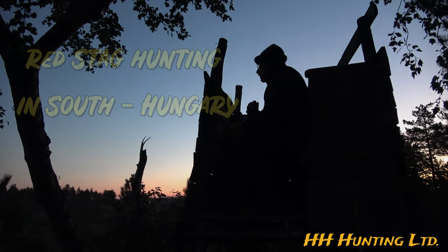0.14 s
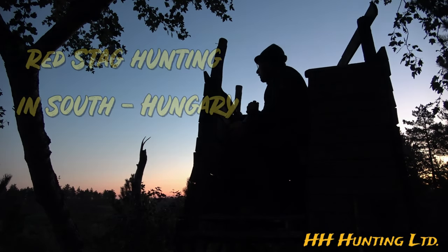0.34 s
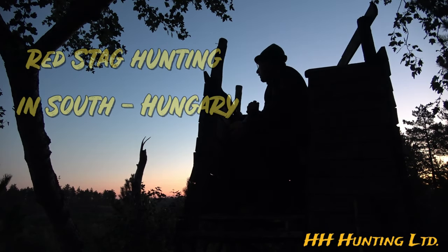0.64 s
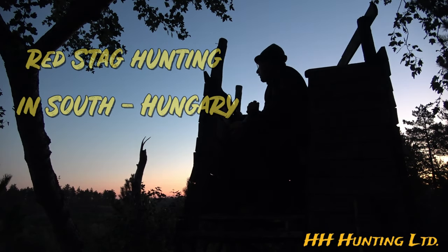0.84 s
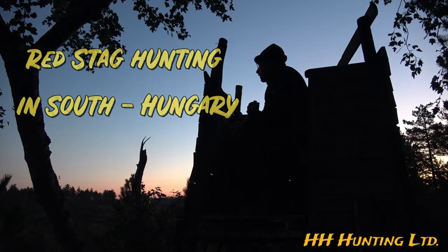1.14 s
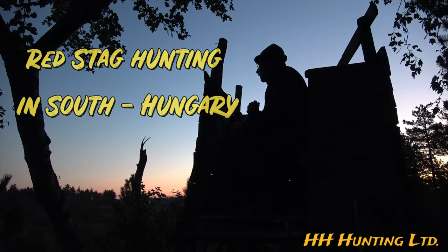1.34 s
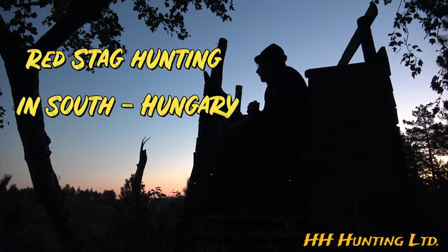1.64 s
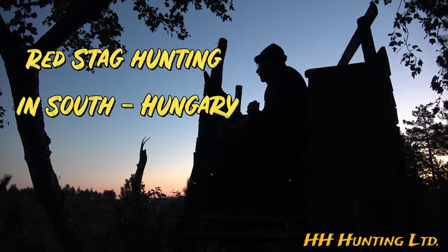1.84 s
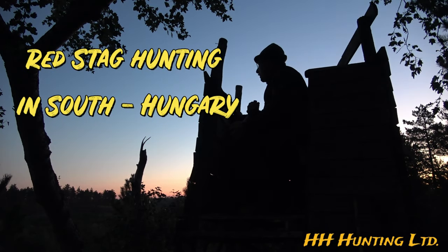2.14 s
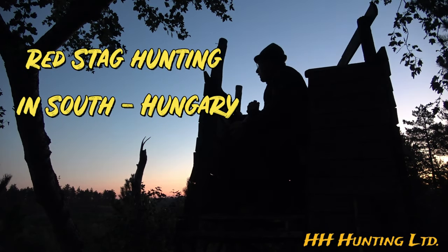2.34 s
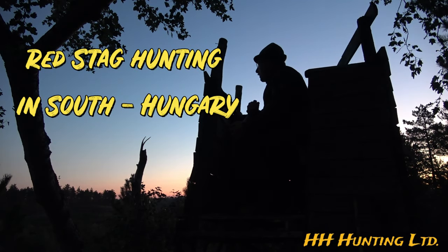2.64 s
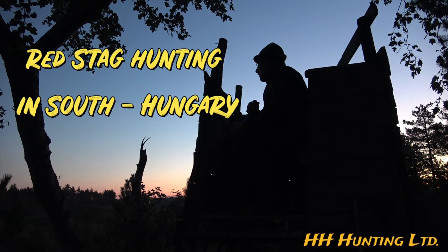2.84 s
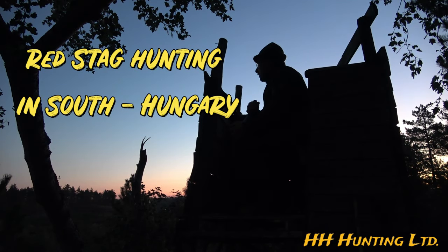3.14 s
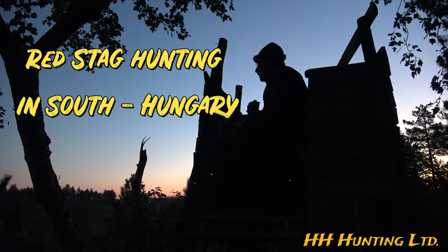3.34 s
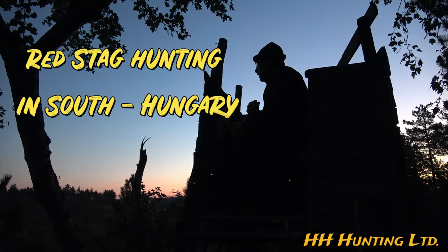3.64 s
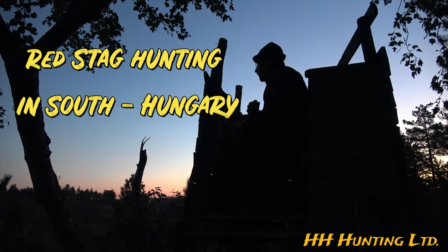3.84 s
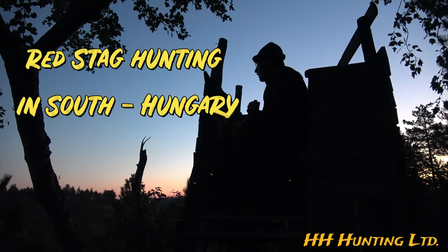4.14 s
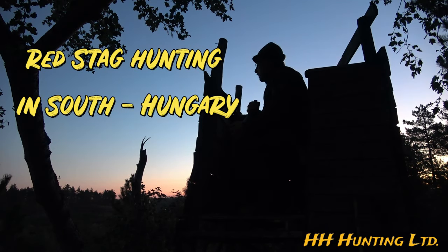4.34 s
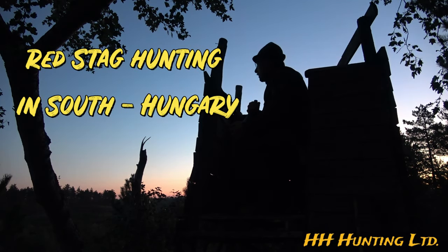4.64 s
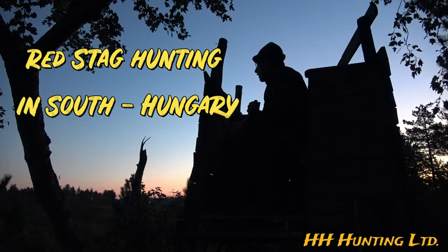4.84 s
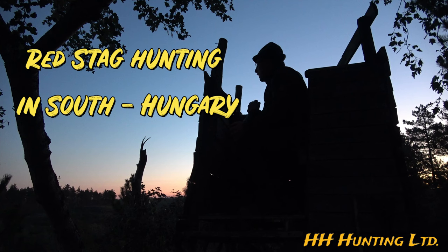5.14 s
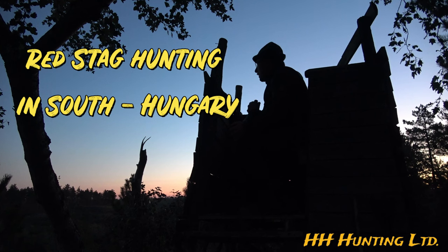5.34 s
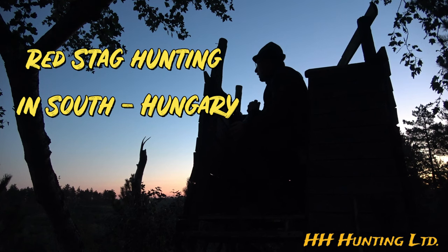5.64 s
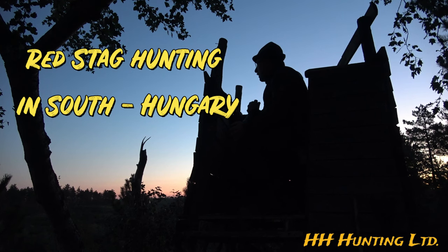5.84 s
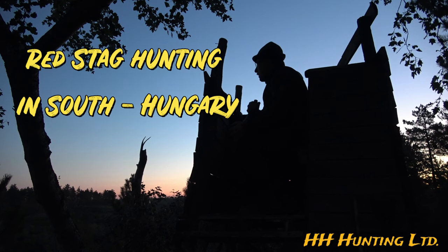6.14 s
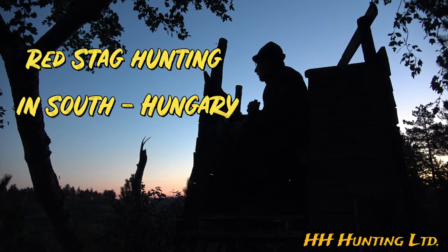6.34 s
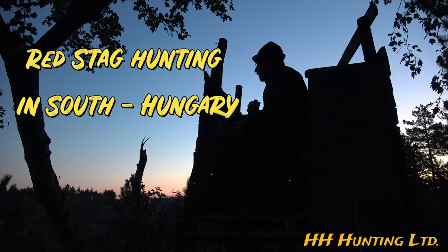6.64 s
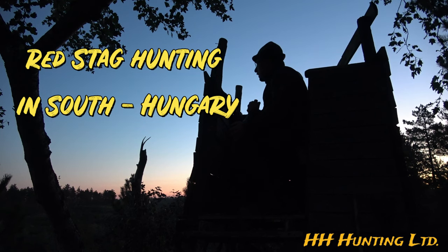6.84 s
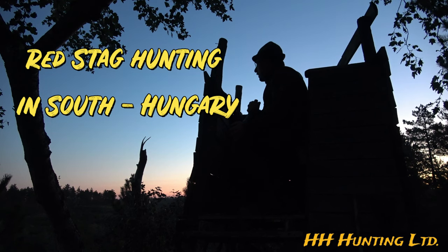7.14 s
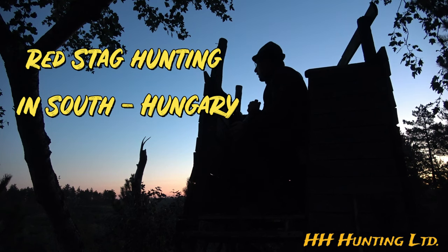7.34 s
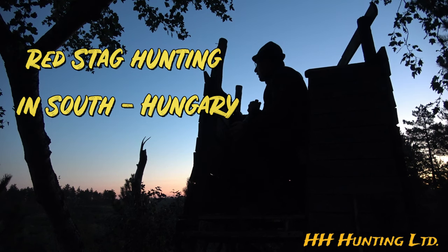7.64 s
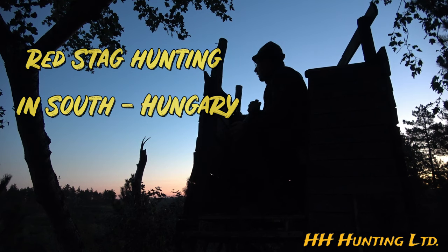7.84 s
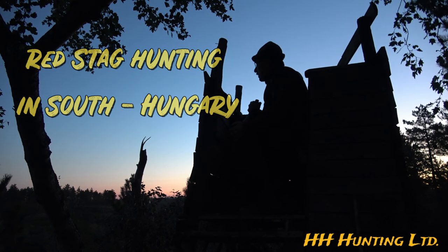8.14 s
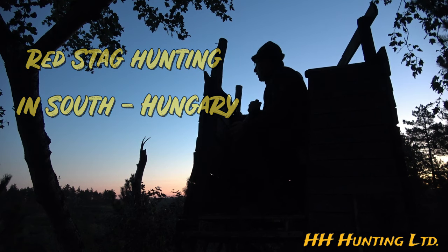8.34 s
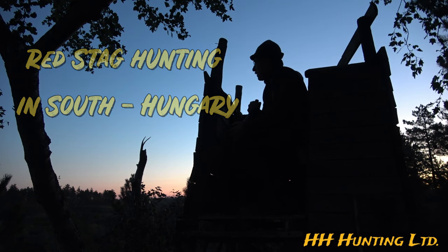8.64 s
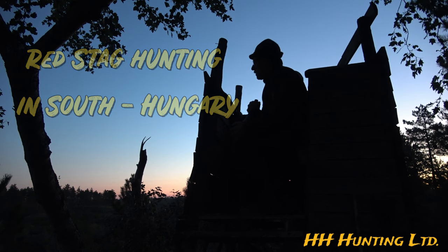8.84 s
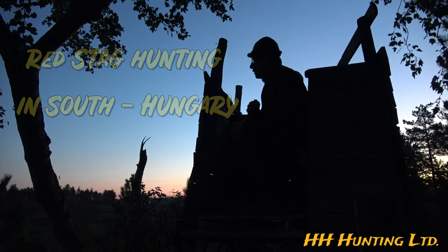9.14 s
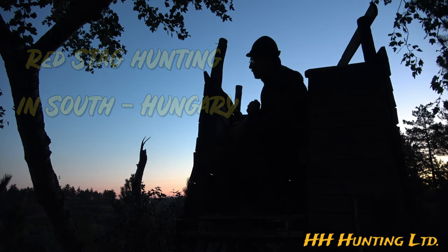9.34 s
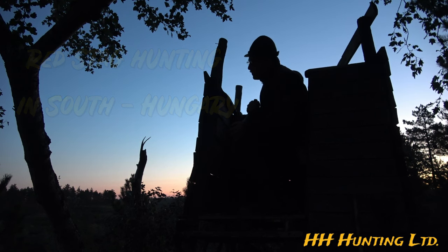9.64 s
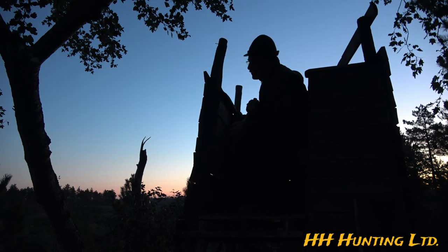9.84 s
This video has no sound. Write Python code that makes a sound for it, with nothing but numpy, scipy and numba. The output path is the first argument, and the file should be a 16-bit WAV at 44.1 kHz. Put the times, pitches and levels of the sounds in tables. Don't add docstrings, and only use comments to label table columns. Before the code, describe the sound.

A stag in rut gives a bout of seven rough, nasal, throaty roars with short gaps between them. The first climbs and drops, the second starts thin, the third is long and level, and the rest become shorter and deeper. Near echoes and a dim forest tail follow. Deep wind thuds on the outdoor microphone throughout, with soft air, sparse cricket trills, small leaf stirrings and dry twig clicks.

```python
import sys
import numpy as np
from scipy import signal
from scipy.fft import rfft, irfft
from scipy.io import wavfile
from scipy.ndimage import uniform_filter1d
from numba import njit

SR = 44100
rng = np.random.default_rng(int(sys.argv[2]) if len(sys.argv) > 2 else 0)


def how_loud(loudness_db):
    steps = np.asarray(loudness_db, float) / 20
    return 10 ** steps


def dump_mix(stems):
    frames = np.atleast_2d(stems).T
    limited = np.clip(frames, -1, 1)
    pcm = np.round(limited * 32767).astype(np.int16)
    wavfile.write(sys.argv[1], SR, pcm)


N = 440118

ROAR_1 = [(1.74, 73.2, -51, -16, 643), (1.908, 76.8, -39, -17.5, 527), (1.958, 80.7, -38, -11.5, 508),
          (2.196, 137.9, -34.5, -8, 475), (2.352, 143.9, -32, -10, 480), (2.448, 138.2, -33, -6, 485),
          (2.496, 122.2, -29, -13.5, 476), (2.542, 107.6, -29, -12.5, 478.5), (2.63, 94.5, -43, 1.5, 457)]
ROAR_2 = [(3.102, 94.1, -57.5, -1.5, 935), (3.325, 112.5, -51, -2.5, 881),
          (3.512, 105.8, -32.5, -16.5, 523), (3.636, 136.4, -37.5, -12.5, 453),
          (3.7, 140, -34.5, -9.5, 440), (3.852, 138.7, -31.5, -9, 450), (3.927, 124.4, -35, -4, 484.4),
          (4.017, 92.9, -30, -12.5, 473.7), (4.1, 88.3, -42.5, -4, 486)]
ROAR_3 = [(4.289, 101.6, -46, -7, 587.6), (4.456, 119.6, -35, -10, 577), (4.596, 111.3, -38, -7.5, 620),
          (4.871, 109.7, -37, -8, 579), (5.19, 99.5, -28.5, -17, 496.2), (5.392, 111.7, -32, -12, 551.5),
          (5.637, 112.6, -32, -11, 574.4), (5.83, 107.7, -36, -8.5, 578.3),
          (5.959, 86.6, -30.5, -14, 587.5)]
ROAR_4 = [(6.291, 103.6, -54, -4, 895), (6.42, 114.7, -41.5, -7, 853), (6.506, 116.1, -47, 3.5, 803),
          (6.58, 104.1, -36, -11.5, 658), (6.647, 82.54, -32, -16, 564), (6.698, 75.85, -41.5, -9, 536),
          (6.856, 77.3, -42, -7.5, 453.4), (6.961, 74.5, -50, 1, 420)]
ROAR_5 = [(7.29, 96.8, -41.5, -5, 620), (7.394, 108.5, -37.5, -9, 596), (7.606, 107.9, -36, -7.5, 552),
          (7.701, 104.4, -35.5, -7.5, 548.4), (7.8, 90.6, -29.5, -15, 539), (7.86, 78.3, -31.5, -10, 527),
          (7.899, 71.1, -51, -16, 523)]
ROAR_6 = [(8.181, 76.2, -39, -13, 631), (8.269, 94.5, -38.5, -10.5, 583), (8.398, 91.8, -29, -21, 544.5),
          (8.495, 84, -37, -14.5, 531), (8.593, 83.14, -35.5, -17, 513), (8.746, 74.2, -45, -7.5, 487),
          (8.83, 74.3, -41, -22, 469.6)]
ROAR_7 = [(9.07, 78.95, -45, -15, 602), (9.18, 94.1, -38.5, -12, 589), (9.212, 93.5, -34, -20, 582.3),
          (9.366, 96.16, -37.5, -15.5, 563), (9.422, 91.5, -32.5, -19.5, 534.6),
          (9.524, 73.4, -37, -14, 532), (9.599, 68.2, -47, -21, 500)]
BOUT = [ROAR_1, ROAR_2, ROAR_3, ROAR_4, ROAR_5, ROAR_6, ROAR_7]


def rms_one(x):
    return x / np.sqrt(np.mean(x ** 2) + 1e-20)


def in_time(rows):
    s, *columns = np.transpose(rows)
    return [np.interp(np.arange(N) / SR, s, c) for c in columns]


def coloured(spectrum):
    hz, level_db = np.transpose(spectrum)
    grid = np.log(np.arange(N // 2 + 1) * SR / N + 1)
    gain = how_loud(np.interp(grid, np.log(hz), level_db, left=-120, right=-120))
    return rms_one(irfft(rfft(rng.standard_normal(N)) * gain, N))


def drift(rate_hz):
    lowpass = signal.butter(2, rate_hz, fs=SR, output="sos")
    return rms_one(signal.sosfilt(lowpass, rng.standard_normal(N)))


def evened(x):
    power = uniform_filter1d(x ** 2, size=1500)
    return x / np.sqrt(uniform_filter1d(power, size=1500) + 1e-12)


def evened_slowly(x):
    return x / np.sqrt(uniform_filter1d(x ** 2, size=9000) + 1e-12)


def by_roar(rows):
    which = np.searchsorted([roar[0][0] for roar in BOUT[1:]], np.arange(N) / SR)
    return np.transpose(rows)[:, which]


def wind():
    # [t/s, level/dB]
    gusts = [(0.0, -23.5), (0.16, -28), (1.47, -22), (1.5, -28), (1.8, -23.5), (6.75, -24), (7.39, -26),
             (7.48, -21), (7.92, -33), (8.0, -22), (8.26, -33), (8.31, -21), (8.5, -27.5), (9.67, -23),
             (9.76, -29), (9.98, -23)]
    # [f/Hz, level/dB per Hz]
    colour = [(4.7, -49), (8.0, -1.5), (22, -1.5), (40, -2), (62, -6.5), (82, -26.5), (110, -43),
              (180, -120)]
    rumble = np.tanh(0.081 * evened_slowly(coloured(colour)))
    return how_loud(*in_time(gusts)) * rms_one(rumble)


def air():
    # [f/Hz, level/dB per Hz]
    colour = [(48, -66), (82, -1.5), (145, 0), (207, -8.5), (246, -16.5), (366, -14), (450, -19.5),
              (1000, -27.5), (1400, -34), (2200, -47.5), (3500, -43.5), (8000, -48), (11000, -47),
              (15800, -48.5)]
    level_db = -41.5 + 0.35 * drift(3)
    return how_loud(level_db) * coloured(colour)


def leaves():
    # [peak t/s, level/dB, rise t/s, fall t/s]
    stirrings = [
        (1.64, -62.5, 0.32, 0.82),
        (6.32, -70.5, 0.069, 0.26),
        (7.449, -63, .12, 0.093),
        (9.8, -65.5, .05, 0.12),
        (9.98, -59.5, 0.076, 0.061),
    ]
    # [f/Hz, level/dB per Hz]
    colour = [(300, -2), (1000, 2.5), (3000, -4.5), (5000, -19.5), (12000, -22.5), (16000, -46)]
    t = np.arange(N) / SR
    swell = how_loud(-70.5)
    for peak_s, level_db, rise_s, fall_s in stirrings:
        distance = np.where(t < peak_s, (peak_s - t) / rise_s, (t - peak_s) / fall_s)
        swell = swell + how_loud(level_db) * np.exp(-distance * 2)
    grain = how_loud(6.5 + 0.53 * drift(36))
    return swell * grain * coloured(colour)


def twigs():
    # [lowest f/Hz, highest f/Hz, decay t/ms]
    kinds = [(450, 1400, 3), (700, 3600, 1.8), (2200, 6500, 2), (3300, 4400, 6), (2000, 5000, 7),
             (5500, 15500, 1.5)]
    # [t/s, peak level/dB]
    ticks_by_kind = [
        [(.763, -48), (.946, -48), (4.322, -43), (6.187, -49), (6.905, -51), (8.812, -42)],
        [(4.274, -50), (6.575, -42), (9.312, -50), (9.617, -44), (9.626, -49)],
        [(4.279, -55), (6.291, -62), (7.327, -55), (8.813, -60), (9.444, -55), (9.893, -51.5)],
        [(4.368, -49), (4.432, -56), (4.485, -55), (6.305, -52), (6.325, -55), (6.482, -51), (9.072, -54)],
        [(6.237, -55), (9.789, -66), (9.8, -55)],
        [(6.301, -48), (6.576, -52), (9.893, -42)],
    ]
    out, t = np.zeros(N + 2000), np.arange(2000) / SR
    for (low_hz, high_hz, decay_ms), ticks in zip(kinds, ticks_by_kind):
        band = signal.butter(2, [low_hz, high_hz], "band", fs=SR, output="sos")
        for s, peak_db in ticks:
            click = rng.standard_normal(2000) + 3 * (t == 0)
            tick = signal.sosfilt(band, click * np.exp(-1000 * t / decay_ms))
            out[round(s * SR):][:2000] += how_loud(peak_db + 6) * tick / np.abs(tick).max()
    return out[:N]


def crickets():
    # [f/Hz, slide f/Hz, chirps per second]
    singers = [(2620, 260, 38.5), (2775, 40, 32.5), (1720, 60, 50)]
    # [start t/s, end t/s, level/dB]
    trills_by_cricket = [
        [(.005, .5, -64), (1.6, 2.05, -64), (5.6, 6.08, -71), (8.27, 8.93, -67)],
        [(.3, .88, -68), (2.62, 3.1, -79), (9.4, 9.82, -69)],
        [(1.17, 1.24, -62)],
    ]
    out, t = np.zeros(N), np.arange(N) / SR
    for (hz, slide_hz, per_s), trills in zip(singers, trills_by_cricket):
        for start, end, level_db in trills:
            stroke = ((t - start) * per_s + .04 * drift(10)) % 1
            tone_hz = hz + slide_hz * (.35 - stroke) + 15 * drift(26.0)
            tone = np.sin(2 * np.pi * np.cumsum(tone_hz) / SR)
            chirp = np.sin(np.pi * np.clip(stroke / 0.75, 0, 1)) * tone
            swell = np.clip(np.minimum((t - start) / 0.022, (end - t) / 0.069), 0, 1)
            out += how_loud(level_db + 5.5) * swell * chirp
    return out * how_loud(2.0 * drift(3.6))


def forest(x):
    t60_s, level_db, gap_s = 1.8, -14.5, .06
    t = np.arange(2 * SR) / SR
    tail = rng.standard_normal(len(t)) * how_loud(-60 * t / t60_s) * (t > gap_s)
    tail = tail / np.sqrt(np.sum(tail ** 2))
    band = signal.butter(1, [1000, 2600], "band", fs=SR, output="sos")
    return how_loud(level_db) * signal.fftconvolve(x, signal.sosfilt(band, tail))[:N]


def hoarseness(pitch_hz):
    # [at the start 0-1, at the end 0-1, dying time t/s]
    ends = [(.25, .5, .14), (.55, .48, .14), (.6, .42, .11), (.5, .45, .38), (.5, .36, .07),
            (.45, .36, .22), (.42, .36, .1)]
    settle_s, strain_hz = .09, 120
    t = np.arange(N) / SR
    octaves_per_s = np.gradient(np.log2(pitch_hz)) * SR
    glide = np.abs(uniform_filter1d(octaves_per_s, size=4000))
    strain = np.clip(np.log2(pitch_hz / strain_hz), 0, 1)
    rough = .045 + .014 * glide + .3 * strain
    for roar, (first, last, dying_s) in zip(BOUT, ends):
        since, until = t - roar[0][0], roar[-1][0] - t
        unsettled = first * np.clip(1 - since / settle_s, 0, 1)
        dying = last * np.clip(1 - until / dying_s, 0, 1)
        rough = rough + (since > 0) * (until > 0) * (unsettled + dying)
    return np.clip(rough, 0, .8)


def folds(pitch_hz, rough):
    shaken_hz = pitch_hz * (1 + (.001 + .12 * rough ** 1.5) * drift(60))
    cycles = np.cumsum(shaken_hz) / SR
    at = np.flatnonzero(np.diff(np.floor(cycles)) > 0)
    late = (np.ceil(cycles[at]) - cycles[at]) / (cycles[at + 1] - cycles[at])
    strength = how_loud(8 * rough[at] * rng.standard_normal(N)[at]) * np.sqrt(SR / pitch_hz[at])
    pulses = np.zeros(N)
    pulses[at] += strength * (1 - late)
    pulses[at + 1] += strength * late
    open_folds = np.sin(np.pi * cycles) ** 2
    breath = open_folds * rng.standard_normal(N)
    return (1 - rough) * pulses + 1.4 * rough * breath


@njit
def resonate(x, turn, r):
    y = np.zeros(len(x))
    for i in range(2, len(x)):
        y[i] = (1 - r * r) / 2 * (x[i] - x[i - 2]) + turn[i] * y[i - 1] - r * r * y[i - 2]
    return y


def formant(x, hz, width_hz, level_db):
    r = np.exp(-np.pi * 1.5 * width_hz / SR)
    turn = 2 * r * np.cos(2 * np.pi * hz / SR) * np.ones(N)
    return how_loud(level_db) * resonate(resonate(x, turn, r), turn, r)


def throat(source, second_hz):
    # [second resonance f/Hz, first f/Hz, third f/Hz, fourth f/Hz,
    # fifth f/Hz, sixth f/Hz, first resonance level/dB, nose level/dB]
    postures = [(450, 371, 873, 1423, 1860, 2298, 8, -20), (502, 314, 950, 1498, 1890, 2296, -4, -29.5),
                (568.6, 360, 1012, 1528, 1990, 2293, -7, -4.5),
                (620, 362, 1090, 1574, 1911, 2265, -11.5, -12.5),
                (873, 502, 1138, 1600, 1740, 2170, 13, -10)]
    # [first resonance shift f/Hz, third shift f/Hz, fifth shift f/Hz,
    # first resonance level/dB, nose level/dB]
    bearing = [(10, -38, -170, 4.5, 0), (-4, -16, -160, 5.5, 3.5), (11.5, 34, -55, -0.5, 7.5),
               (4, -5, 5, 6.5, 6), (9, 5, -5, 1, 11), (8, 11, 16, 3.5, 3.5), (37, -15, -7, 2, 10)]
    fifth_db = [(3,), (2,), (-2,), (0,), (-1.5,), (-3.5,), (3,)]
    # [width f/Hz, level/dB]
    moving = [(78, 8.5), (47.2, 11.5), (81, 4), (77, 6), (71.5, 2), (89, -0.5)]
    # [f/Hz, width f/Hz, level/dB]
    mouth = [(2614, 76, -7), (2852, 114, -14.5)]
    # [f/Hz, width f/Hz, level/dB]
    nose_branch = [(807, 20, 3), (1354, 5.9, 8), (1740, 45, -0.5)]
    posture_hz, *followers = np.transpose(postures)
    first_hz, *upper_hz, first_db, nose_db = [np.interp(second_hz, posture_hz, f) for f in followers]
    first_shift, third_shift, fifth_shift, more_first_db, more_nose_db = by_roar(bearing)
    third, fourth, fifth, sixth = [hz * (1 + .018 * drift(3.7)) for hz in upper_hz]
    moving_hz = [first_hz + first_shift, second_hz, third + third_shift, fourth, fifth + fifth_shift, sixth]
    rings = [formant(source, hz, *m) for hz, m in zip(moving_hz, moving)]
    rings += [formant(source, *m) for m in mouth]
    rings = [ring * how_loud(2.2 * drift(5)) for ring in rings]
    rings[0] = rings[0] * how_loud(first_db + more_first_db)
    rings[4] = rings[4] * how_loud(*by_roar(fifth_db))
    nose = how_loud(nose_db + more_nose_db) * sum(formant(source, *m) for m in nose_branch)
    skirt = formant(source, 1053, 714, -18.5) + formant(source, 572, 60, -5.5)
    return sum((-1) ** k * ring for k, ring in enumerate(rings)) + nose + skirt


def near_echoes(voice):
    # [delay t/s, level/dB]
    echoes = [(.0043, -16.5), (0.0112, -12), (0.0182, -9), (.031, -20.5)]
    return voice + sum(how_loud(level_db) * np.roll(voice, round(s * SR)) for s, level_db in echoes)


def edge_change(start_db, start_s, end_db, end_s):
    t = np.arange(N) / SR
    start, end = by_roar([(roar[0][0], roar[-1][0]) for roar in BOUT])
    start_loss = start_db * np.clip(1 - (t - start) / start_s, 0, 1)
    end_loss = end_db * np.clip(1 - (end - t) / end_s, 0, 1)
    return start_loss + end_loss


def upper_levels(pitch_hz, bright_db, second_hz):
    # [offset level/dB, gain/dB per octave from the roar's top pitch, gain/dB per octave of throat]
    upper = [(1, -1.5, 13.5), (-1, 5, 6), (-3, 11.5, -5.5)]
    # [low band level/dB, middle band level/dB, high band level/dB]
    tone = [(3, 3.5, 0.5), (0, 0.5, 1.5), (-5, -3, -4), (-2, 0, -3), (-6.5, -3.8, -5.5), (-0.5, -1.5, -2),
            (-3, -5, 0.5)]
    # [change at the start/dB,
    # fade t/s, change at the end/dB, fade t/s]
    edges = [(-4.5, 0.24, 0, 0.066), (-6.5, .12, -13, 0.12), (-7, 0.18, 5, 0.088)]
    top_hz, = by_roar([(max(row[1] for row in roar),) for roar in BOUT])
    pitch_octaves = np.log2(pitch_hz / top_hz)
    throat_octaves = np.log2(second_hz / 550)
    levels = []
    for (offset_db, pitch_db, throat_db), tone_db, edge in zip(upper, by_roar(tone), edges):
        patchy_db = 2.5 * drift(8.5)
        level_db = bright_db + tone_db + edge_change(*edge) + patchy_db + offset_db
        levels.append(level_db + pitch_db * pitch_octaves + throat_db * throat_octaves)
    return levels


def stag():
    pitch_hz, low_db, bright_db, second_hz = in_time(np.concatenate(BOUT))
    pitch_hz = uniform_filter1d(pitch_hz, size=round(.06 * SR))
    upper_db = upper_levels(pitch_hz, bright_db, second_hz)
    voice = near_echoes(throat(folds(pitch_hz, hoarseness(pitch_hz)), second_hz))
    edges_hz = [200, 720, 1280, 1900, 3050]
    bands = []
    for pair in zip(edges_hz, edges_hz[1:]):
        band = signal.butter(5, pair, "band", fs=SR, output="sos")
        bands.append(signal.sosfilt(band, voice))
    meeting_db = 0.5 * np.cos(2 * np.pi * second_hz / pitch_hz)
    voice = how_loud(meeting_db) * evened(bands[0])
    voice = voice + sum(how_loud(level_db) * evened(band) for level_db, band in zip(upper_db, bands[1:]))
    overtone = evened(formant(bands[-1] ** 2, 3631.6, 130, 0))
    voice = voice + how_loud(upper_db[-1] - 29.5) * overtone
    t = np.arange(N) / SR
    sounding = sum(np.clip(np.minimum(t - roar[0][0], roar[-1][0] - t) / 0.055, 0, 1) for roar in BOUT)
    return sounding * how_loud(low_db) * voice


def scene():
    roars = stag()
    background = wind() + air() + leaves() + twigs() + crickets()
    return (background + forest(roars) + roars)[None]


def top_cut(x):
    return signal.sosfilt(signal.butter(12, 15930, fs=SR, output="sos"), x)


def record(dry):
    fade = np.clip(np.arange(N)[::-1] / (.008 * SR), 0, 1)
    return top_cut(dry * np.sin(np.pi / 2 * fade) ** 2)


dry = scene()
out = record(dry)
dump_mix(out)
```